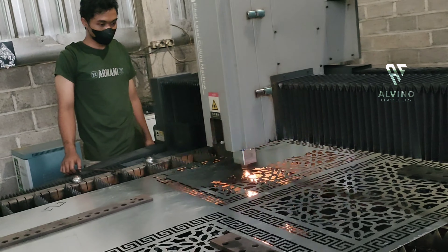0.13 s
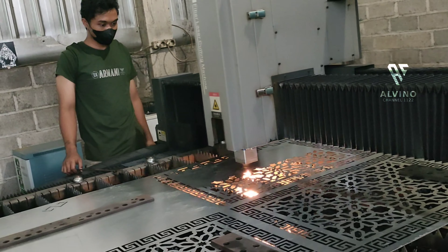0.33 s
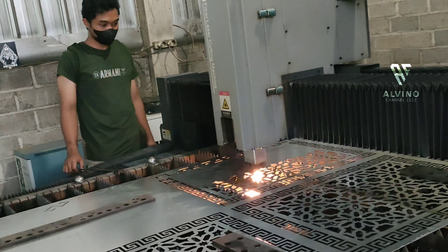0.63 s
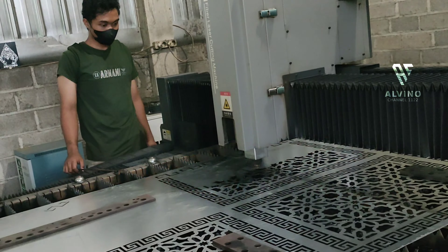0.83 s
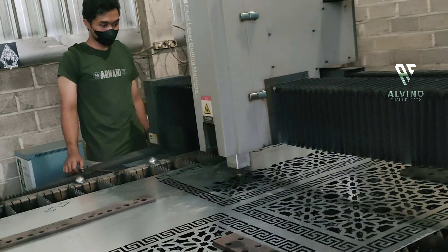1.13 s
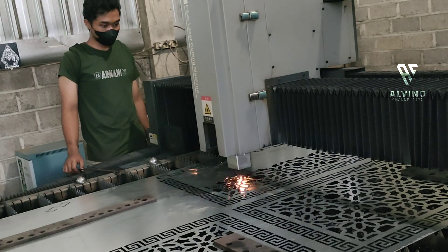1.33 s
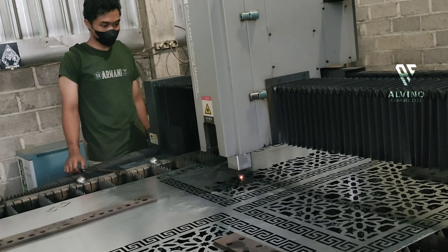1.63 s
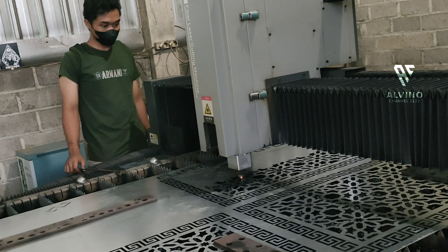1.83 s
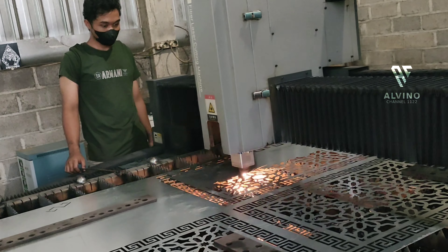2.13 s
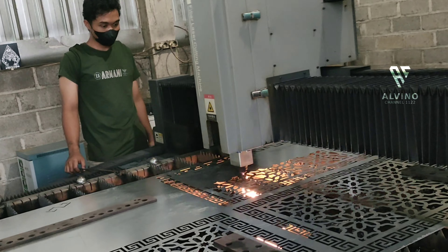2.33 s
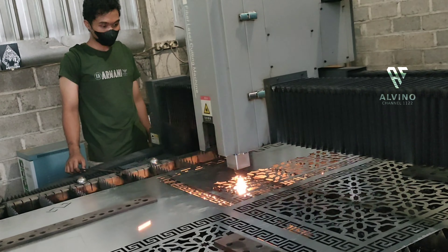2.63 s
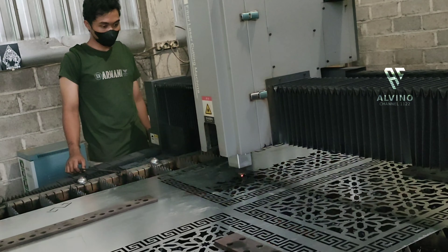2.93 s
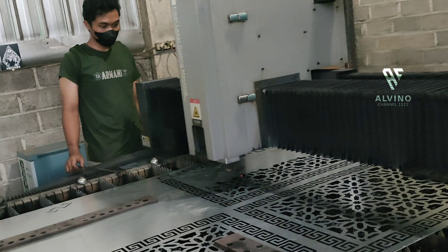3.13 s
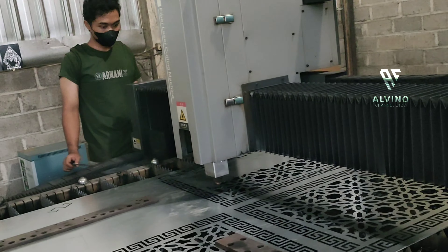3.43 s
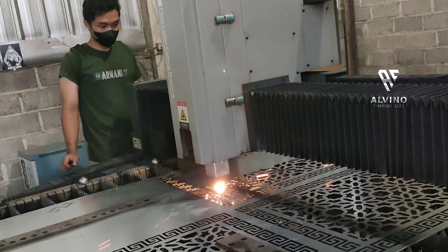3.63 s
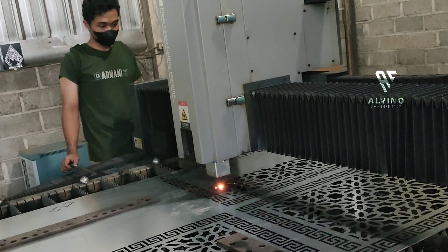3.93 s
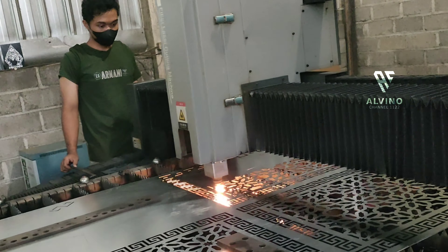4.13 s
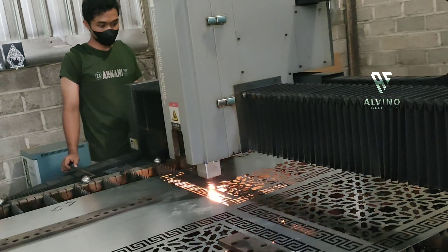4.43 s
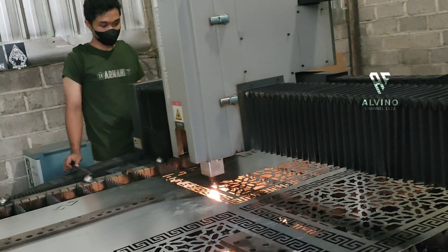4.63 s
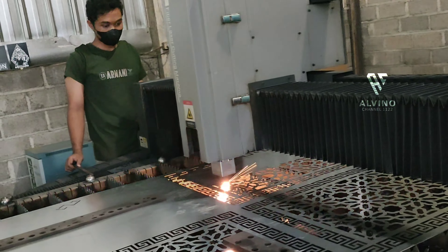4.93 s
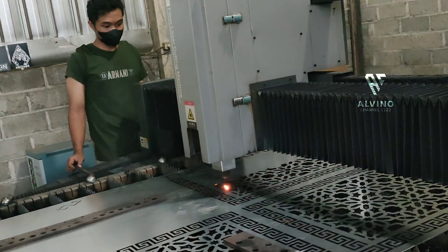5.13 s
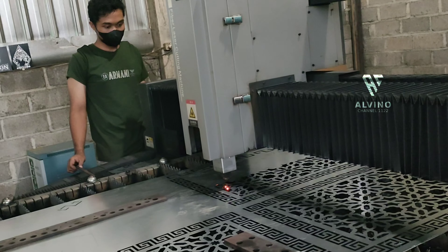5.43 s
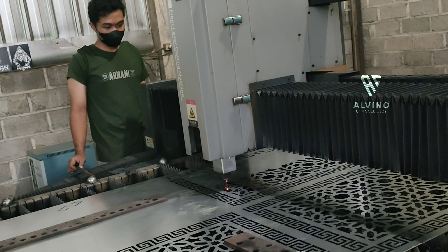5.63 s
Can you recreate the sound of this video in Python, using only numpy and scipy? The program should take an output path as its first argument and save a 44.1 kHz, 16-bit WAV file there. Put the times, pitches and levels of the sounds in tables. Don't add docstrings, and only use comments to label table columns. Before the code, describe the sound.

In a hard-walled workshop, a laser cutter's assist gas hisses loudly and continuously, strongest in the upper mids and treble. It flutters and fizzes in short flares over cut holes. Air rumbles low in the bed and duct, with a faint blower hum and thin high whine. A dull metallic knock comes near one second, a much softer one after three and a half. Close stereo phone pickup, grainy and compressed.

```python
import sys
import numpy as np
from scipy import signal
from scipy.fft import rfft, irfft
from scipy.io import wavfile
from scipy.ndimage import uniform_filter1d, map_coordinates

SR = 44100
rng = np.random.default_rng(int(sys.argv[2]) if len(sys.argv) > 2 else 0)


def ratio_of_db(decibels):
    return 10 ** (np.asarray(decibels, float) / 20)


def file_out(sig):
    cols = np.atleast_2d(sig).T
    lim = np.clip(cols, -1, 1)
    pcm = np.round(lim * 32767).astype(np.int16)
    wavfile.write(sys.argv[1], SR, pcm)


N = 255780

# time in seconds, strength in dB, left over right in dB.
JET_PATH = [(0, -18.5, -4), (.25, -21, -3.5), (.33, -16, -5.5), (.8, -16, -4), (1.3, -18, -5.5),
            (1.5, -17, -3.5), (3.1, -16.5, -4), (3.3, -17.5, 4), (3.4, -19.5, -4), (3.97, -16, -2.5),
            (4.12, -18.5, -2.5), (4.33, -18.5, -1.5), (4.41, -14.5, -2.5), (4.8, -17, -4), (4.93, -16, -3),
            (5.38, -16.5, -3), (5.47, -19, -6), (5.8, -17, -4.5)]
# frequency in Hz, density in dB per Hz.
HISS_COLOUR = [(760, -28), (1300, -16.5), (1620, -14), (2070, -9), (2510, -5), (3330, -1.5), (3830, -2.5),
               (5040, -2.5), (6100, -4.5), (7330, -12.5), (7800, -20), (8100, -30), (10500, -26),
               (17800, -120)]
# frequency in Hz, density in dB per Hz.
FIZZ_COLOUR = [(6500, -44.5), (7900, -14.5), (8200, -6.5), (8700, -4), (10200, -1), (11900, 0), (12700, -3),
               (13800, -0.5), (14600, -4.5), (15000, -5), (15450, -4.5), (15740, -7), (15850, -58)]
# time in seconds, rise in dB, half length in seconds.
HOLE_FLARES = [
    (.38, 4.5, .08),
    (1.03, 2.5, .06),
    (2.8, 1, 0.065),
    (3.15, 4.5, 0.083),
    (3.3, 4, 0.054),
    (3.96, 4.5, 0.073),
    (4.79, 2.5, 0.074),
    (5.32, 2.5, 0.076),
    (5.68, 0.5, .05),
]
# time in seconds, level in dB.
CARRIAGE_KNOCKS = [
    (0.98, -28.5),
    (3.66, -43.5),
]
# frequency in Hz, level in dB, time to fall 60 dB in seconds.
FRAME_MODES = [(248, 0.5, 0.37), (282, 4, 0.17), (231, -11, 0.2), (1034, 0.5, 0.18), (1057, 5, 0.16),
               (1233, 5, 0.079), (1420, 6.5, .09), (2520, 2, .06)]
# time in seconds, level in dB.
BED_DRAUGHT = [(0, -34), (.2, -32.5), (.92, -35.5), (1.0, -32), (1.1, -36), (2.2, -34), (2.55, -38),
               (3.0, -33), (3.45, -37.5), (3.7, -32.5), (4.4, -33), (4.75, -37), (5.35, -34), (5.5, -40.5),
               (5.8, -36)]
# frequency in Hz, density in dB per Hz.
RUMBLE_COLOUR = [(11, -40), (18, -0.5), (80, 4.5), (184, 1), (240, 1), (282, 4), (330, -4), (430, -10),
                 (730, -120)]
# frequency in Hz, width in Hz, height in dB.
BED_RESONANCES = [(48, 5.9, -4), (97.2, 9.9, 5.5), (133.7, 4, 12), (160.5, 9.7, 8), (194.5, 17, 7)]
# time in seconds, rise in dB, half length in seconds.
DUCT_BOOMS = [
    (.4, 3, 0.23),
    (2.2, 3.5, 0.088),
    (2.55, 3.5, 0.13),
    (3.0, 3.5, 0.05),
    (3.6, 1, 0.054),
    (4.33, 5, 0.1),
    (4.55, 4, 0.11),
    (5.0, 3, 0.065),
]
# frequency in Hz, density in dB per Hz.
ROAR_COLOUR = [(130, -33), (220, -7.5), (449, -5.5), (500, -5.5), (744, -7.5), (1040, -4.5), (1530, -6),
               (1900, -1.5), (2470, -57), (4180, -120)]
# frequency in Hz, rms level in dB.
BLOWER_TONES = [(99, -55), (198.5, -48.5), (371, -56), (595, -57), (792, -58), (1188, -57), (3760, -35.5),
                (4720, -43), (5001, -39)]
# frequency in Hz, left-right likeness from 0 to 1.
NOISE_LIKENESS = [(25, 0.79), (60, 0.98), (160, 1), (400, 0.99), (750, 0.33), (1000, .5), (1500, 0.38),
                  (2500, 0.15), (5500, 0.029), (6700, .3), (7100, .6), (8100, .6), (8500, 0.085),
                  (12200, 0.14), (13000, 0.36), (15500, 0.16)]
# frequency in Hz, lead of the left port in radians.
PORT_LEAD = [(0, 0), (400, .05), (1030, .3), (1640, 2.6), (1980, 3.2), (2500, 6.1), (3190, 6.7),
             (3620, 9.7), (3880, 9.8), (4220, 12.5), (5250, 12.4), (5860, 4 * np.pi)]
# frequency in Hz, left over right in dB.
PORT_TILT = [(40, -3.5), (100, -0.5), (400, -0.15), (800, 1.5), (1500, 1.1), (3200, -1.76), (4000, 3),
             (5000, -0.06), (6500, 0.5), (8000, -14), (9000, 7), (12000, -2), (15000, -3.5)]
# frequency in Hz, step size over band level in dB.
STEP_COARSENESS = [(100, -30), (450, -10), (750, 2.5), (1500, 4.5), (2500, 2.5), (3350, 3), (3650, 8.5),
                   (5500, 8.5), (6600, 9.5), (7200, 8), (7900, 8), (8300, 11.5), (9300, 9.5), (10300, 11),
                   (12000, 12), (12800, 10), (15800, 9.5)]


def unit(x):
    return x / np.sqrt(np.mean(x ** 2) + 1e-20)


def along(points, hz):
    f, v = np.transpose(points)
    return np.interp(np.log(hz + 1), np.log(f + 1), v)


def curves(rows):
    s, *columns = np.transpose(rows)
    return [np.interp(np.arange(N) / SR, s, column) for column in columns]


def swells(rows):
    t = np.arange(N) / SR
    return sum(db * np.exp(-((t - s) / half) ** 2) for s, db, half in rows)


def wobble(rate):
    knots = rng.standard_normal(int(N * 40 / SR) + 4)
    return map_coordinates(knots, [np.arange(N) * min(rate, 40) / SR])


def rush(gain, patchy_db):
    z = signal.stft(rng.standard_normal((2, N + 4096)), nperseg=512)[2]
    patches = uniform_filter1d(rng.standard_normal(z.shape[1:]), size=7, axis=0)
    patches = uniform_filter1d(patches, size=12, axis=1)
    pair = signal.istft(z * ratio_of_db(patchy_db * unit(patches)), nperseg=512)[1]
    hz = np.fft.rfftfreq(pair.shape[1], 1 / SR)
    shared, apart = rfft(pair) * gain(hz)
    turn = np.arccos(np.clip(along(NOISE_LIKENESS, hz), 0, 1)) / 2
    lead = np.exp(.5j * np.interp(hz, *np.transpose(PORT_LEAD)))
    left = (np.cos(turn) * shared + np.sin(turn) * apart) * lead
    right = (np.cos(turn) * shared - np.sin(turn) * apart) / lead
    out = irfft(np.array([left, right]), pair.shape[1])[:, :N]
    return out / np.sqrt(np.mean(out.mean(0) ** 2))


def jet():
    strength_db, pan_db = curves(JET_PATH)
    body_db = strength_db - 2.5
    surge_db = strength_db - strength_db.mean()
    edge_db = body_db + 1 + .3 * surge_db
    fizz_db = body_db - 10 + 0.18 * surge_db + swells(HOLE_FLARES)
    flutter = wobble(15)

    def edge_share(hz):
        return 1 / (1 + (4300 / (hz + 1)) ** 8)

    def body_gain(hz):
        return ratio_of_db(along(HISS_COLOUR, hz)) * np.sqrt(1 - edge_share(hz))

    def edge_gain(hz):
        return ratio_of_db(along(HISS_COLOUR, hz)) * np.sqrt(edge_share(hz))

    def fizz_gain(hz):
        return ratio_of_db(along(FIZZ_COLOUR, hz))

    body = ratio_of_db(body_db + 0.45 * flutter) * rush(body_gain, patchy_db=0.84)
    edge = ratio_of_db(edge_db + .6 * wobble(11)) * rush(edge_gain, patchy_db=0.46)
    fizz = ratio_of_db(fizz_db + 0.36 * flutter) * rush(fizz_gain, patchy_db=1.3)
    return (body + edge + fizz) * ratio_of_db(np.array([pan_db, -pan_db]) / 2)


def carriage():
    out, t = np.zeros(N + SR), np.arange(SR // 2) / SR
    for s, db in CARRIAGE_KNOCKS:
        ring = np.zeros(len(t))
        for hz, level, t60 in FRAME_MODES:
            fade = ratio_of_db(level + rng.normal(0, 2) - 60 * t / t60)
            ring += fade * np.sin(2 * np.pi * hz * t + rng.uniform(0, 6.4))
        rattle = 1.6 * uniform_filter1d(rng.standard_normal(len(t)), size=14) * ratio_of_db(-60 * t / .13)
        soft_start = 1 - np.exp(-t / .012)
        out[round(s * SR):][:len(t)] += ratio_of_db(db) * (ring + rattle) * soft_start
    return out[:N]


def bed():
    roar_db, = curves(BED_DRAUGHT)
    rumble_db = -38 + .4 * (roar_db - roar_db.mean()) + swells(DUCT_BOOMS)

    def rumble_gain(hz):
        power = 1 + sum(ratio_of_db(2 * db) / (1 + (2 * (hz - centre) / width) ** 2)
                        for centre, width, db in BED_RESONANCES)
        return ratio_of_db(along(RUMBLE_COLOUR, hz)) * np.sqrt(power)

    def roar_gain(hz):
        return ratio_of_db(along(ROAR_COLOUR, hz))

    rumble = rush(rumble_gain, patchy_db=-1.0)
    roar = rush(roar_gain, patchy_db=1.15)
    return ratio_of_db(rumble_db + .6 * wobble(7)) * rumble + ratio_of_db(roar_db + wobble(12)) * roar


def blower():
    t, out = np.arange(N) / SR, np.zeros((2, N))
    for hz, db in BLOWER_TONES:
        phase = 2 * np.pi * hz * t + 1.1 * wobble(4) + rng.uniform(0, 2 * np.pi)
        lead = np.interp(hz, *np.transpose(PORT_LEAD))
        side_db = -2.2 * (hz > 2000)
        level_db = db + 2.2 * wobble(4) + [[side_db], [-side_db]]
        out += np.sqrt(2) * ratio_of_db(level_db) * np.sin([phase + lead, phase])
    return out


def scene():
    return jet() + carriage() + bed() + blower()


def phone_squeeze(x, scatter_db):
    size, width, start = 1024, 16, 1024 + 300
    k = np.arange(2 * size) + .5
    window = np.sin(np.pi * k / (2 * size))[:, None]
    waves = np.cos(np.pi / size * np.outer(k + size / 2, k[:size]))
    basis = window * waves * np.sqrt(2 / size)
    count = N // size + 3
    padding = ((0, 0), (start, (count + 1) * size - N - start))
    ms = np.pad([x[0] + x[1], x[0] - x[1]], padding).reshape(2, -1, size)
    c = np.concatenate([ms[:, :-1], ms[:, 1:]], axis=2) @ basis
    c = c.reshape(2, count, -1, width)
    level = np.sqrt(uniform_filter1d(np.mean(c ** 2, axis=(0, 3)), size=3, axis=0) + 1e-12)

    luck = uniform_filter1d(rng.standard_normal((2, *level.shape)) + rng.standard_normal(level.shape),
                            size=2, axis=1)
    luck = unit(luck)
    hz = (np.arange(size // width) + .5) * width * SR / (2 * size)
    treble_luck = .6 * (hz > 8000) * unit(uniform_filter1d(luck, size=3, axis=2))
    step = level * ratio_of_db(along(STEP_COARSENESS, hz) + scatter_db * luck + treble_luck)
    step = step[..., None]

    apart = (rng.random(level.shape) < .33) & (hz > 900) & (hz < 6400)
    apart = apart[..., None]

    def swap(v):
        return np.where(apart, np.array([v[0] + v[1], v[0] - v[1]]) / np.sqrt(2), v)

    c = swap(c)
    c = swap(np.sign(c) * np.floor(np.abs(c) / step + .4) * step)
    frames = c.reshape(2, count, size) @ basis.T
    joined = (frames[:, 1:, :size] + frames[:, :-1, size:]).reshape(2, -1)
    mid, side = joined[:, start - size:][:, :N]
    return np.array([mid + side, mid - side]) / 2


def low_pass(x):
    return signal.sosfilt(signal.butter(12, 16020, fs=SR, output="sos"), x)


def record(dry):
    half_db = along(PORT_TILT, np.fft.rfftfreq(N, 1 / SR)) / 2
    ports = irfft(rfft(dry) * ratio_of_db(np.array([half_db, -half_db])), N)
    x = phone_squeeze(ports, scatter_db=2.0)
    mix = x / (1 + np.abs(x) ** 6) ** (1 / 6)
    return low_pass(mix)


dry = scene()
out = record(dry)
file_out(out)
```